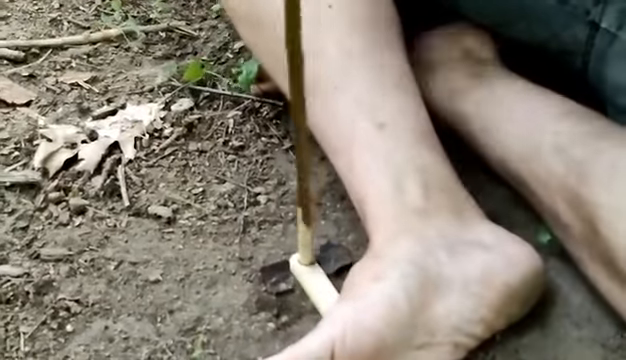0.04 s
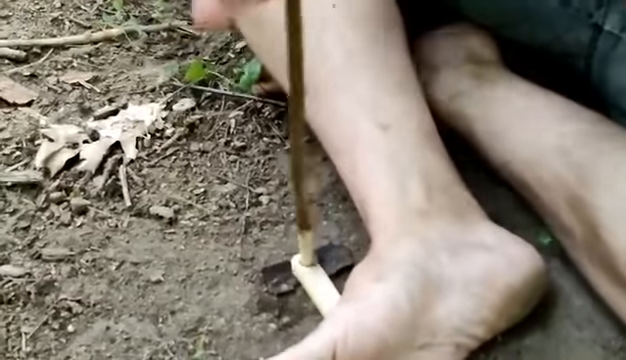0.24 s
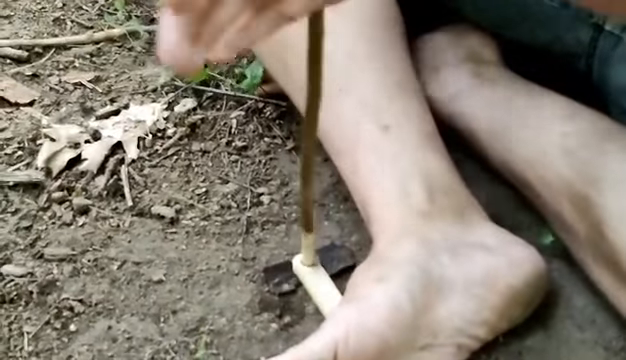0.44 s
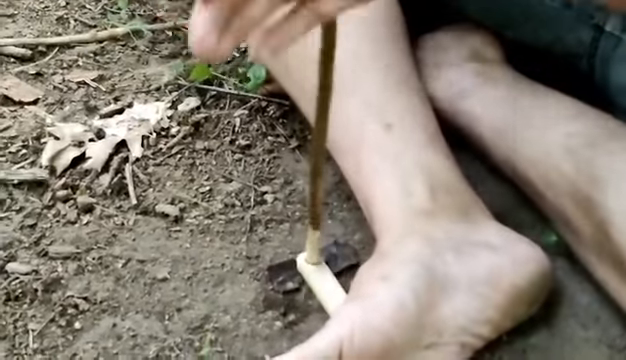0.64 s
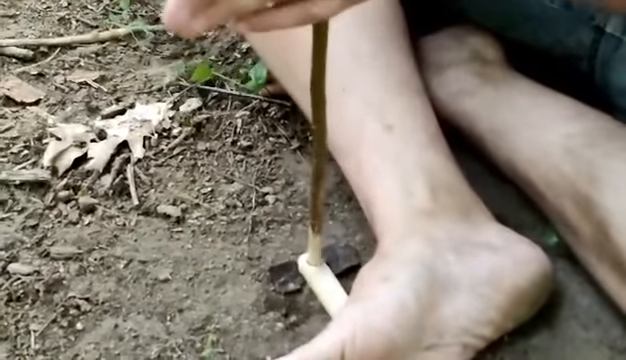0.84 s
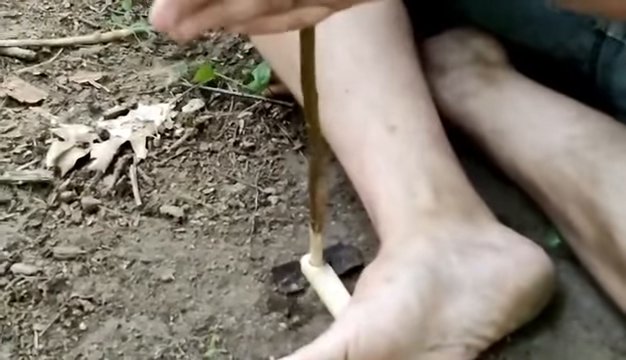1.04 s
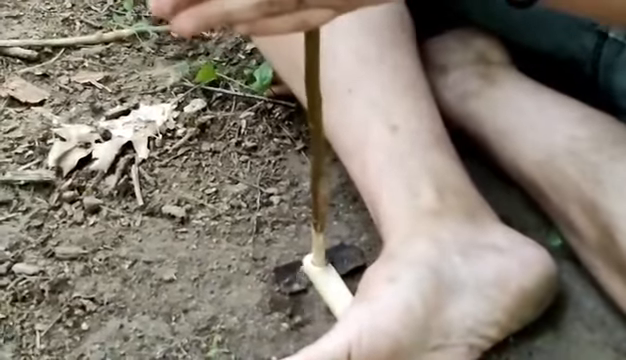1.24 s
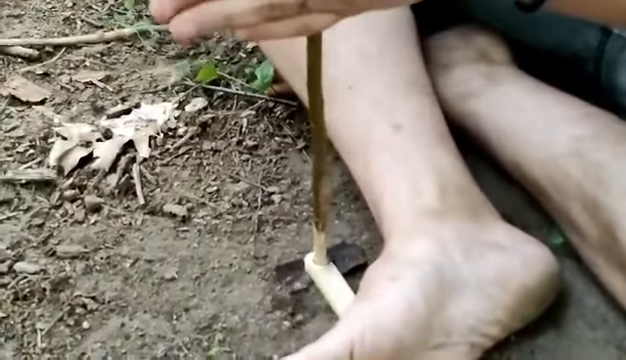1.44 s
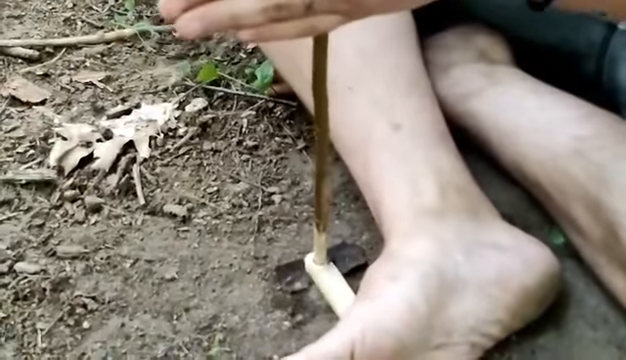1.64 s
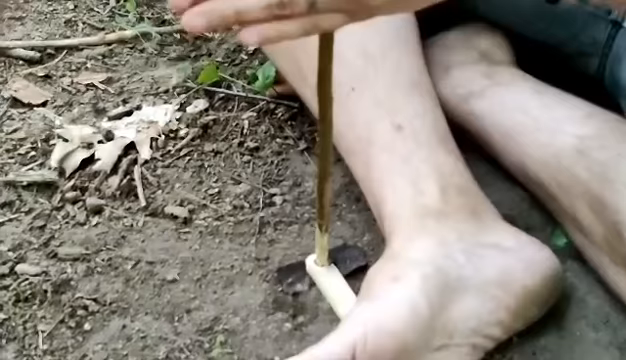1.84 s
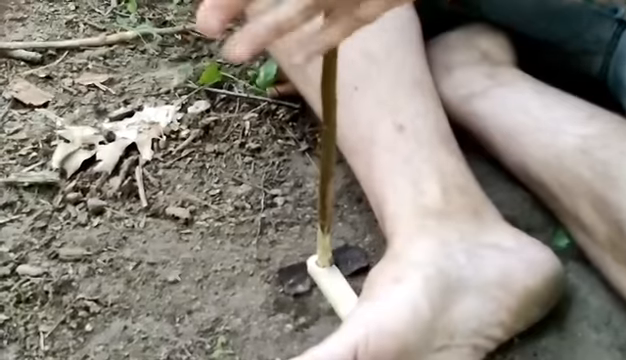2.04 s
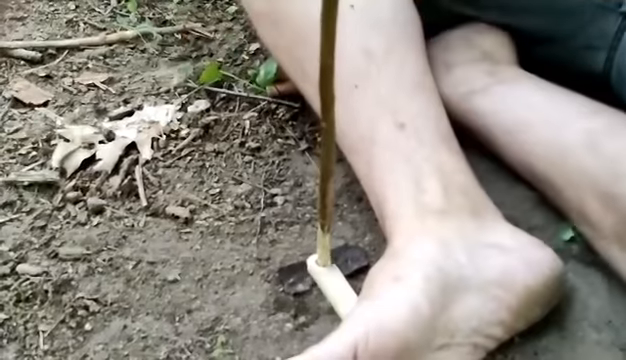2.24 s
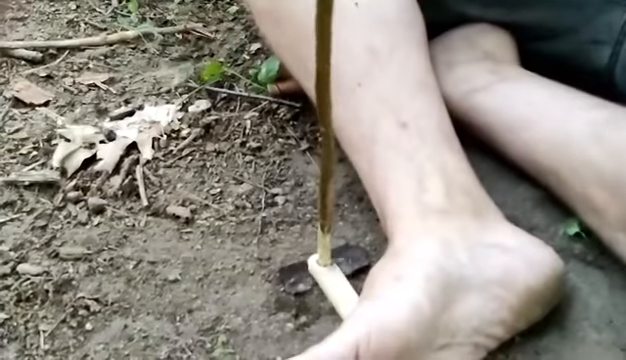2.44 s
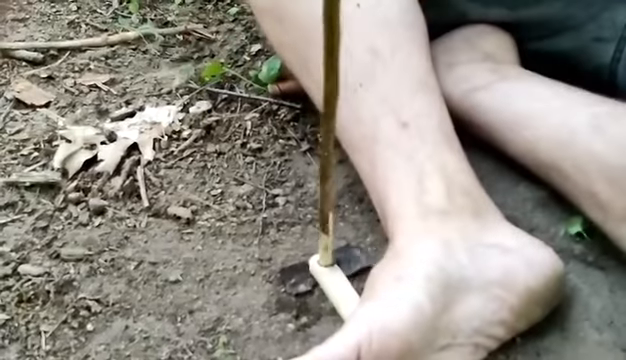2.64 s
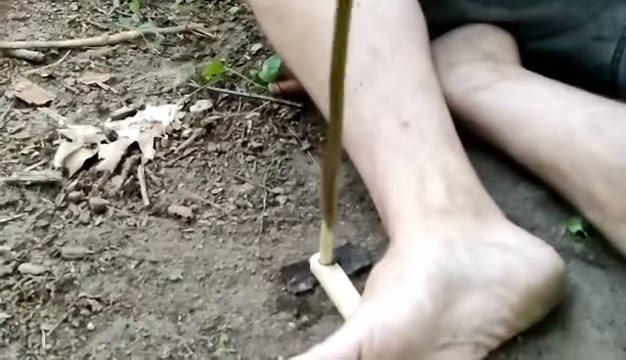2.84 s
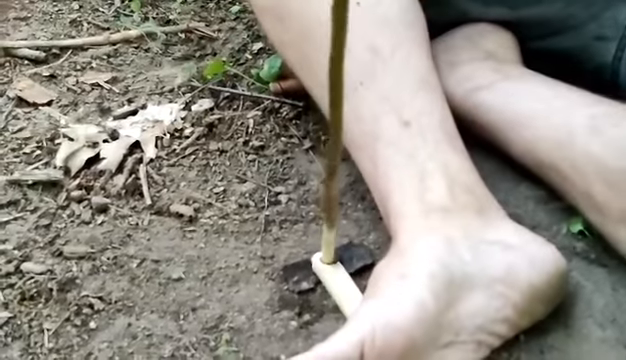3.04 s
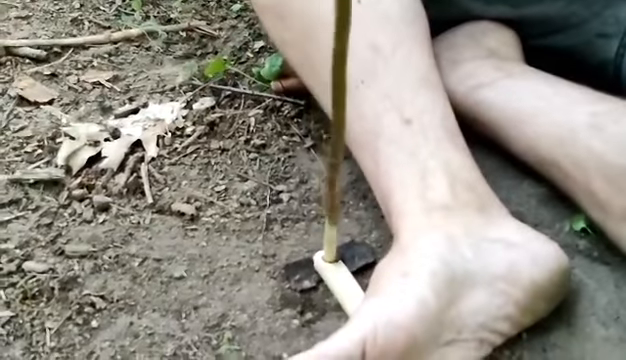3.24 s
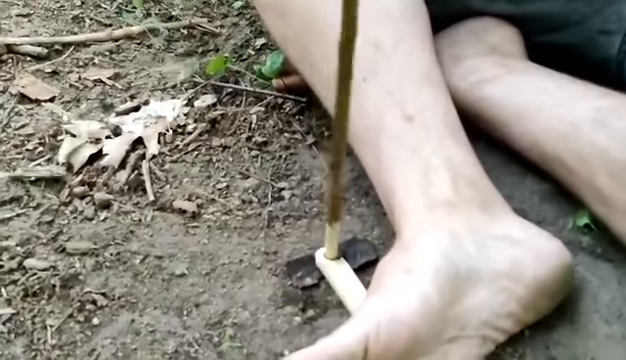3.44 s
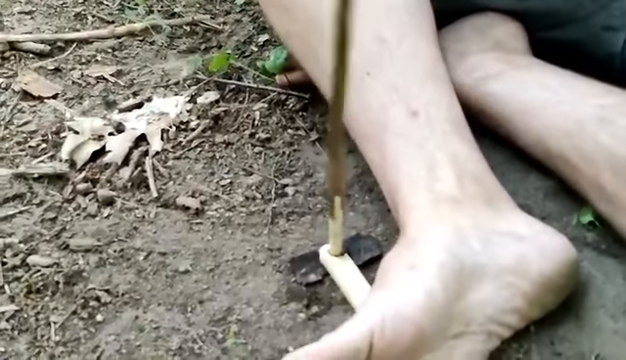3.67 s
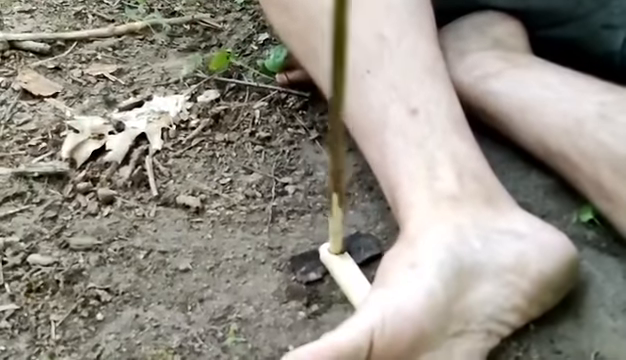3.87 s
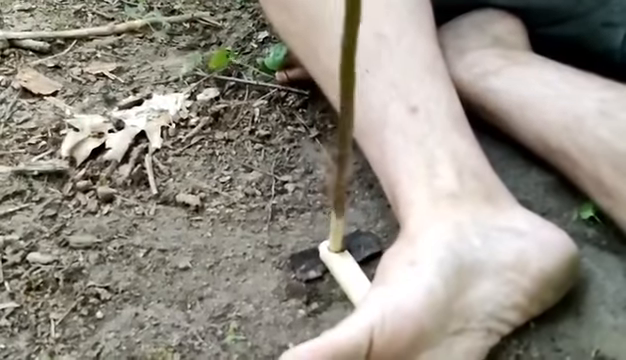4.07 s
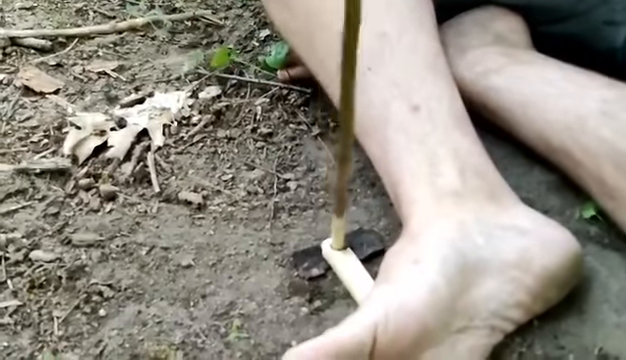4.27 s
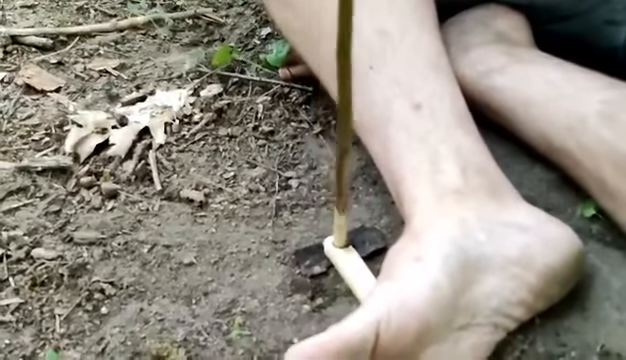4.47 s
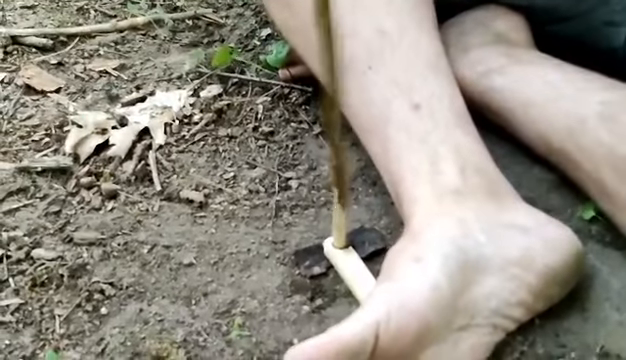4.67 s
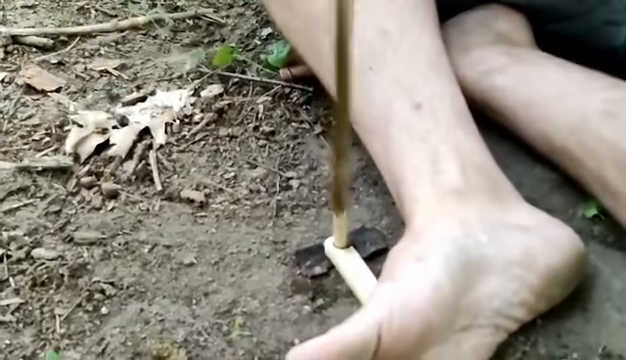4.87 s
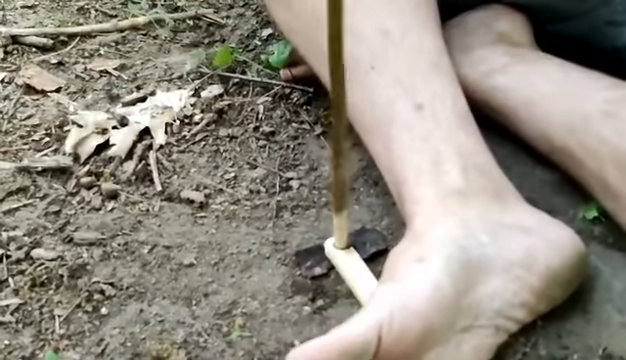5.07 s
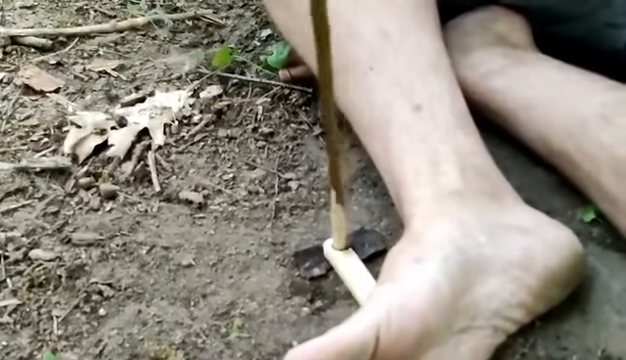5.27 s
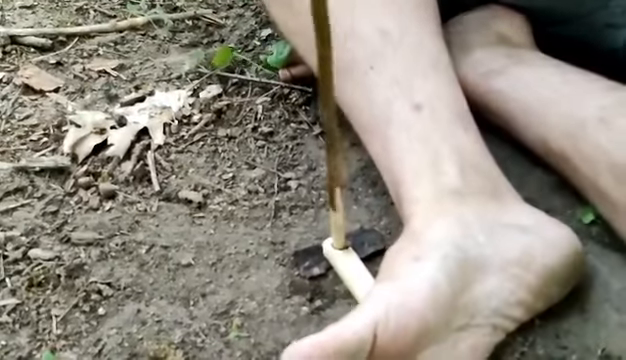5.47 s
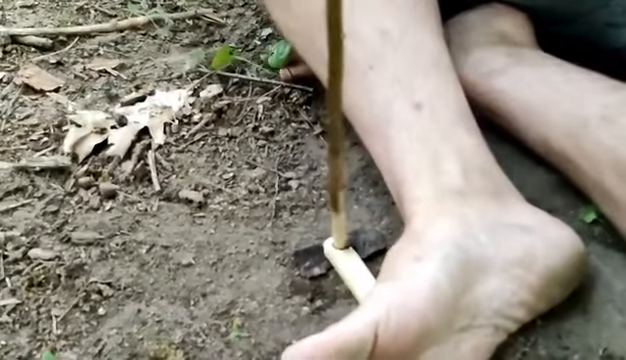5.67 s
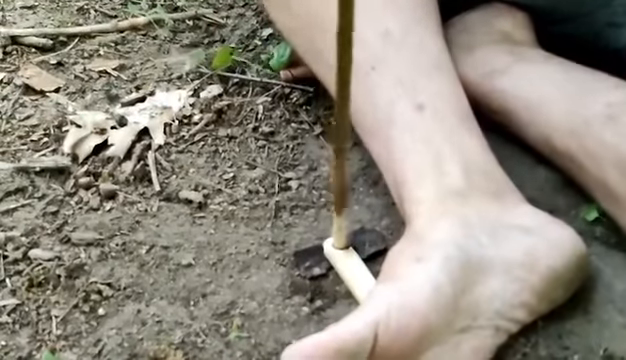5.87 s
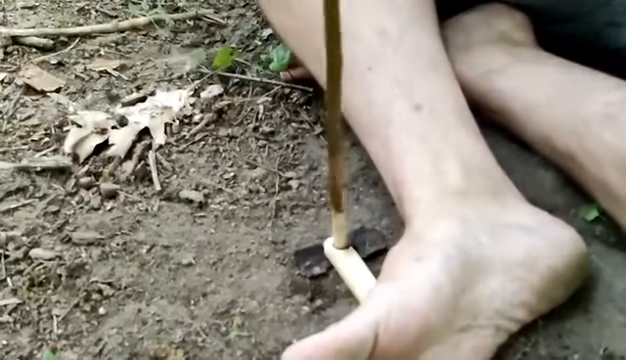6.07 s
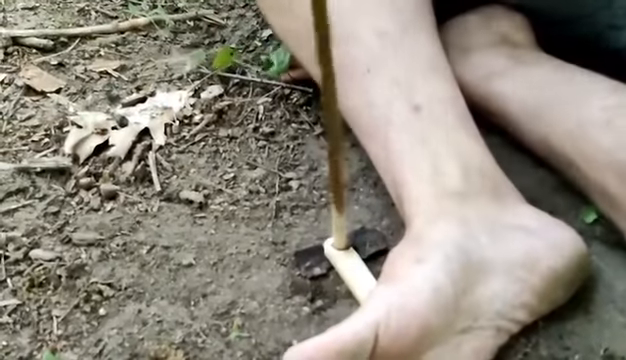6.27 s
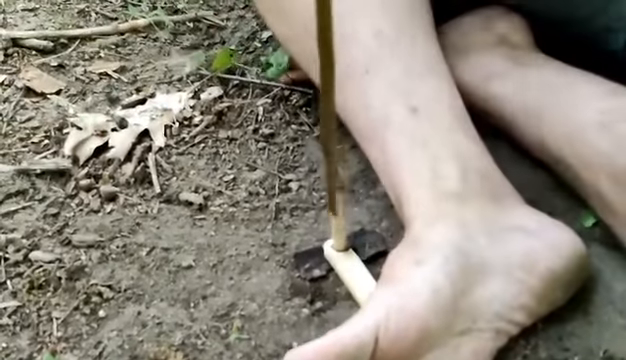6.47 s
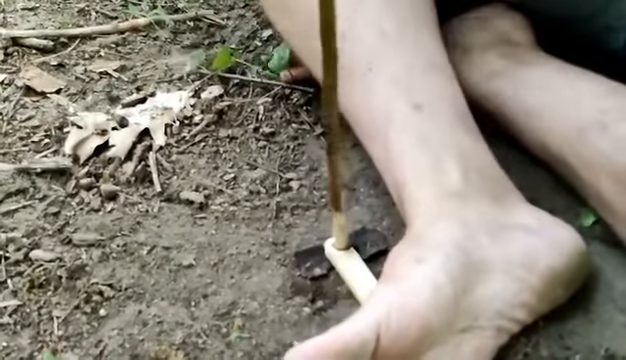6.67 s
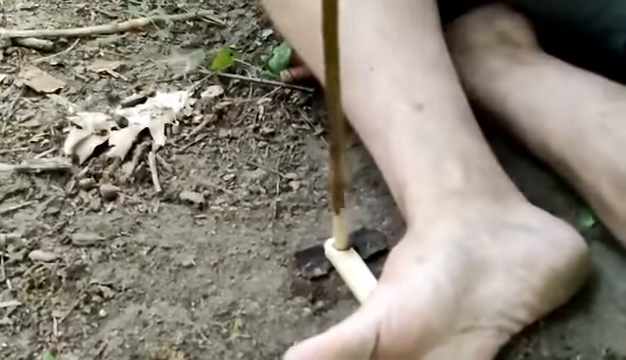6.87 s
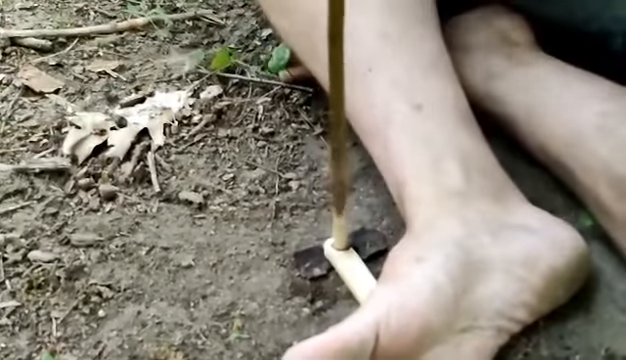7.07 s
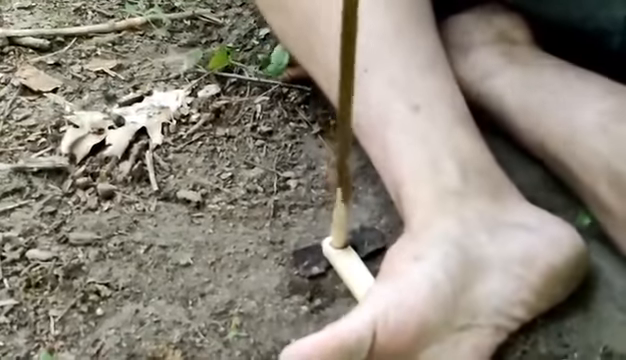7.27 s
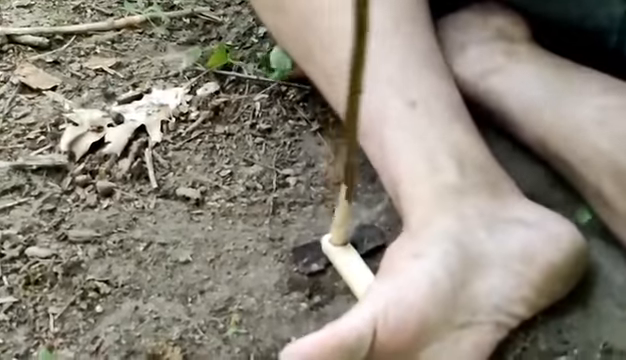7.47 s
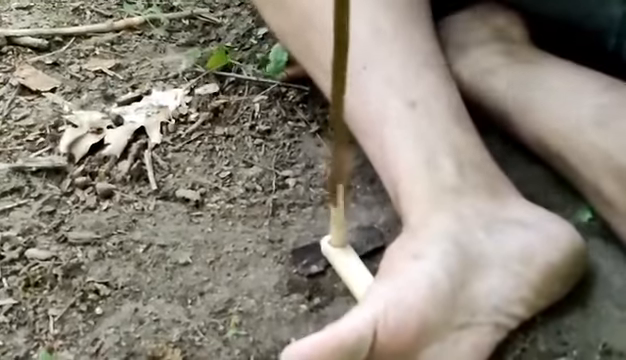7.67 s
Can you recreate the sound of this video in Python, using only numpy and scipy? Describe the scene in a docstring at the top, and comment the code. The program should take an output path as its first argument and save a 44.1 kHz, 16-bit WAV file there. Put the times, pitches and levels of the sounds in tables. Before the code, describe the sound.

Close to the microphone, palms spin a wooden stick in a board: a few quick, dry, scratchy strokes, then a pause of nearly two seconds with only leaf hush and low far rumble. Sharp little finger ticks on the phone mark the restart, and rapid even rubbing continues to the end with occasional small wood knocks. A faint distant engine hums below. Open forest, no echo, handheld phone stereo.

```python
"""Hand drill on a forest floor

Palms spin a wooden spindle to and fro in a board: slipping fibres excite noise bands, swelling per stroke.
Hands pause and start again; tip knocks ring the board's modes. Banded noise makes leaves and far traffic,
sines a far engine. A phone listens with two unlike ports: the left is shaded, lags and hears finger ticks.
"""
import sys
import numpy as np
from scipy import signal
from scipy.io import wavfile

SR = 44100
rng = np.random.default_rng(int(sys.argv[2]) if len(sys.argv) > 2 else 0)


def log_audio(samples):
    """Write samples as a 16-bit WAV file to the path given in sys.argv[1]."""
    # one column per channel
    frames = np.atleast_2d(samples).T
    # limit to full scale, then quantise
    limited = np.clip(frames, -1, 1)
    pcm = np.round(limited * 32767).astype(np.int16)
    wavfile.write(sys.argv[1], SR, pcm)


N = 340011
HOP = 16   # samples per step of slow curves


def amp(db):
    """dB to gain."""
    return np.exp(np.asarray(db) * (np.log(10) / 20))


def at_hz(points, hz):
    """Read a table on a log-frequency axis."""
    table_hz, values = np.array(points).T
    return np.interp(np.log(hz), np.log(table_hz), values)


def in_time(rows):
    """Columns of a curve at every sample."""
    s, *columns = np.transpose(rows)
    return [np.interp(np.arange(N) / SR, s, c) for c in columns]


def drift(rate_hz, size=N, step=1):
    """Low-passed noise of spread 1, one value every step samples."""
    r = np.exp(-2 * np.pi * rate_hz * step / SR)
    settle = SR // step
    slow = signal.lfilter([1], [1, -2 * r, r * r], rng.standard_normal(size + settle))[settle:]
    return slow / slow.std()


def coarse_drift(rate_hz):
    """Drift held over HOP samples."""
    return np.repeat(drift(rate_hz, size=N // HOP + 1, step=HOP), HOP)[:N]


def band(x, low_hz, high_hz):
    """Band-pass that turns unit white noise into unit power per kHz."""
    sos = signal.butter(2, [low_hz, high_hz], "band", fs=SR, output="sos")
    return signal.sosfilt(sos, x) * np.sqrt(SR / 2000)


def decaying_mode(clicks, hz, t60_s):
    """Two-pole resonator: each click starts a sine that falls 60 dB in t60_s."""
    r, w = amp(-60 / (t60_s * SR)), 2 * np.pi * hz / SR
    return signal.lfilter([0, np.sin(w)], [1, -2 * r * np.cos(w), r * r], clicks)


# noise common to both ports: [f/Hz, share/1]
PORT_LIKENESS = [(100, 0.99), (300, 0.75), (520, .68), (860, 0.82), (1400, 0.68), (1900, .35), (2400, .55),
                 (2950, 0.72), (3450, .25), (4100, .55), (4900, 0.35), (6000, 0.13), (10500, 0.12),
                 (12000, 0.62), (13000, 0.6)]


def port_pair(white, hz, lag, facing_s=(0, 0)):
    """Left and right noise from two draws; the shared part reaches left late, except in facing_s."""
    alike = np.clip(at_hz(PORT_LIKENESS, hz), 0, 1)
    shared_left = np.roll(white[0], round(at_hz(lag, hz) * SR))
    facing = slice(round(facing_s[0] * SR), round(facing_s[1] * SR))
    shared_left[facing] = white[0, facing]
    left = alike * shared_left + np.sqrt(1 - alike ** 2) * white[1]
    return np.array([left, white[0]])


# forest hush spectrum, relative: [f/Hz, level/dB]
LEAF_SPECTRUM = [(250, -15), (400, 0.5), (700, -5), (1100, -7), (1700, -6), (2400, -8), (3700, -11.5),
                 (5000, -15), (6500, -20), (8300, -25), (13000, -32)]
# left port lag for forest sound: [f/Hz, lag/s]
FOREST_LAG = [(100, .00004), (1000, .0001), (1700, .0003), (13000, .0003)]
# shaded left port against the right: [f/Hz, level/dB]
LEFT_PORT = [(300, 3.5), (1100, 0.5), (2400, 1), (3000, 1.5), (3700, -11.5), (4600, -5.5), (5500, -18.5),
             (6700, -40), (7500, -26), (9200, -14.5), (10000, -11.5), (11000, -14.5), (12000, -8),
             (13000, 3)]


def leaves():
    """Hush: third-octave noise bands that swell together and on their own."""
    base_db = -61
    edges_hz = 250 * 2 ** np.arange(0, 5.7, 1 / 3)
    white = rng.standard_normal((2, 2, N))
    gust, out = coarse_drift(0.47), 0
    for k, (low, high) in enumerate(zip(edges_hz, edges_hz[1:])):
        hz = np.sqrt(low * high)
        shade_db = [[0.35 * at_hz(LEFT_PORT, hz)], [0]]   # sound from all round is shaded less
        swell_db = 0.92 * gust + 2.2 * coarse_drift(9)
        gain = amp(base_db + at_hz(LEAF_SPECTRUM, hz) + swell_db) * amp(shade_db)
        out = out + band(gain * port_pair(white[k % 2], hz, FOREST_LAG), low, high)
    return out


# traffic spectrum, relative: [f/Hz, level/dB]
RUMBLE_SPECTRUM = [(45, -2), (70, -2), (100, -4), (150, -9), (200, -15), (280, -25.5)]
# low sound of the place: [t/s, rumble level/dB, air thud level/dB, thud lean to left/dB]
LOW_SOUND = [(0.0, -48, -41.5, -1), (1.1, -51, -49, 8), (2.2, -52.5, -50.5, 6.5), (3.4, -47, -48, 16.5),
             (3.62, -43, -36, 15), (3.8, -48.5, -43.5, 12.5), (4.6, -46.5, -44.5, 3),
             (6.2, -45.5, -45.5, 15), (7.0, -44.5, -47, 18), (7.71, -43, -47, 12)]


def rumble(rumble_db, thud_db, lean_db):
    """Far traffic in third-octave bands that swell on their own; loose air thuds at the ports below."""
    edges_hz, bands = 45 * 2 ** np.arange(0, 2.7, 1 / 3), 0
    white = rng.standard_normal((2, 2, N))
    for k, (low, high) in enumerate(zip(edges_hz, edges_hz[1:])):
        hz = np.sqrt(low * high)
        gain = amp(at_hz(RUMBLE_SPECTRUM, hz) + 1.96 * coarse_drift(1.0))
        bands = bands + gain * band(port_pair(white[k % 2], hz, FOREST_LAG), low, high)
    shared, own = rng.standard_normal(N), rng.standard_normal((2, N))
    thud = band(shared + 0.55 * own, 9.1, 32.2)
    traffic = amp(rumble_db) * amp([[1.2], [-1.2]]) * bands / bands.std()   # leans left
    return traffic + amp(thud_db + [[.5], [-.5]] * lean_db) * thud / thud.std()


# far engine, one list per gear: [t/s, firing f/Hz, level/dB]
ENGINE_GEARS = [
    [(2.1, 59.84, -55), (2.7, 67.8, -52), (3.4, 77.56, -55.5)],
    [(4.05, 59, -49), (4.4, 60.7, -44), (5.0, 63.36, -50), (5.5, 65.6, -47), (6.2, 68.82, -44.5),
     (7.0, 71.56, -45.5), (7.71, 74.4, -44)],
]
# engine orders: [multiple of firing f/1, level/dB]
ENGINE_ORDERS = [(1, 0), (1.5, -10), (2, -14), (2.5, -14)]


def engine():
    """Far engine in two gears: low orders of the firing rate, wavering on their way through the trees."""
    out, t = np.zeros(N), np.arange(N) / SR
    for gear in ENGINE_GEARS:
        hz, level_db = in_time(gear)
        phase = 2 * np.pi * np.cumsum(hz * (1 + 0.004 * drift(3.9))) / SR
        start_s, end_s = gear[0][0], gear[-1][0]
        fade = np.clip(np.minimum(t - start_s, end_s - t) / 0.067 + 1, 0, 1)
        for multiple, order_db in ENGINE_ORDERS:
            level = amp(level_db + order_db + 1.5 * coarse_drift(1.6))
            out += np.sqrt(2) * fade * level * np.sin(multiple * phase)
    return out * amp([[1.2], [-1.2]])   # leans left


# fingers ticking on the case: [t/s, left level/dB, right level/dB, case ring against tick/dB]
FINGER_TICKS = [(0.1907, -45, -59, -9), (2.1124, -36, -56, -12), (2.1187, -28.5, -55, -22),
                (2.1242, -41, -57, -20), (2.129, -45, -58, -6), (2.1317, -31.5, -58, 4),
                (2.355, -31.5, -66, -23), (2.472, -30.5, -63, -3.5), (2.4885, -40, -58, -3),
                (2.511, -40, -41, 1), (2.7307, -29, -53, -5), (6.0262, -24.5, -51, -9)]


def ticks():
    """A tick pushes the ports once: a short dull pulse on a slower shove, and a brief ring of the case."""
    pulse_hz, shove_hz, shove_db = 2400, 444, 0.5
    clicks, rings = np.full((2, 2, N), 1e-18)
    for s, left_db, right_db, ring_db in FINGER_TICKS:
        clicks[:, round(s * SR)] = -amp([left_db, right_db])
        rings[:, round(s * SR)] = -amp([left_db + ring_db, right_db + ring_db])
    pulse_sos = signal.bessel(4, pulse_hz, fs=SR, output="sos", norm="mag")
    pulse = signal.sosfilt(pulse_sos, clicks) * SR / (2 * pulse_hz)
    shove = signal.lfilter(*signal.butter(1, shove_hz, fs=SR), pulse)
    shove = shove * amp(shove_db) * pulse_hz / (np.pi * shove_hz)
    push = signal.lfilter(*signal.butter(1, 60, "high", fs=SR), pulse + shove)
    ring = decaying_mode(rings, hz=3960, t60_s=0.0058)
    return push + signal.sosfilt(signal.butter(4, 5000, fs=SR, output="sos"), ring)


# knocks on the board, mostly the spindle tip catching in its notch; the faint knock at 6.027 s sounds together
# with a finger tick: [t/s, level/dB]
TIP_KNOCKS = [(.098, -52), (0.167, -44), (0.501, -42), (.543, -41), (1.3324, -39), (2.964, -47),
              (3.582, -32.5), (3.967, -41), (4.427, -34), (4.645, -32.5), (4.756, -38), (5.313, -38),
              (5.771, -39), (5.888, -34), (6.027, -49), (6.148, -43), (6.849, -35.5), (7.661, -36.5)]
# board modes: [f/Hz, level/dB, t60/s]
BOARD_MODES = [(446, -14, 0.042), (900, -6, 0.03), (1540, -6, 0.015), (2300, -7, 0.0074),
               (2740, -9, 0.0087), (3800, -5, 0.017)]


def knocks():
    """Each catch of the tip strikes the board's modes with strengths of its own."""
    times_s, knock_db = np.transpose(TIP_KNOCKS)
    at, out = [round(s * SR) for s in times_s], np.zeros(N)
    strengths_db = rng.normal(0, 0.26, (len(at), len(BOARD_MODES)))
    for (hz, level_db, t60_s), strength_db in zip(BOARD_MODES, strengths_db.T):
        clicks = np.full(N, 1e-18)
        clicks[at] = amp(knock_db + level_db + strength_db)
        out += decaying_mode(clicks, hz, t60_s)
    soft_contact = signal.butter(2, 4500, fs=SR, output="sos")
    return signal.sosfilt(soft_contact, out) * amp([[0.0], [0.5]])


# strokes, pull and push in turn, pull first: [start t/s, end t/s, scrape level/dB]
STROKES = [(-0.03, 0.061, -46), (0.072, 0.17, -45.5), (0.193, 0.303, -48), (0.313, 0.422, -46.5),
           (0.441, 0.556, -49.5), (0.56, 0.67, -51.5), (0.67, 0.748, -64.5), (2.505, 2.545, -59),
           (2.542, 2.641, -45), (2.671, 2.746, -49), (2.763, 2.838, -41.5), (2.86, 2.943, -46.5),
           (2.955, 3.031, -46.5), (3.047, 3.134, -52), (3.147, 3.225, -50), (3.246, 3.332, -51),
           (3.35, 3.432, -46.5), (3.452, 3.551, -48), (3.56, 3.64, -45), (3.663, 3.754, -46),
           (3.765, 3.844, -47), (3.871, 3.956, -47.5), (3.97, 4.055, -48), (4.074, 4.169, -51.5),
           (4.177, 4.26, -49), (4.285, 4.382, -50.5), (4.394, 4.483, -48), (4.504, 4.599, -49.5),
           (4.615, 4.703, -48.5), (4.726, 4.82, -49), (4.829, 4.922, -47), (4.941, 5.044, -48),
           (5.052, 5.151, -47), (5.173, 5.269, -46.5), (5.282, 5.376, -46), (5.404, 5.489, -43),
           (5.503, 5.607, -48.5), (5.631, 5.725, -46), (5.739, 5.834, -46.5), (5.862, 5.952, -46),
           (5.957, 6.066, -50), (6.096, 6.188, -46), (6.199, 6.298, -49), (6.32, 6.418, -51.5),
           (6.423, 6.533, -50.5), (6.539, 6.648, -50), (6.659, 6.761, -49.5), (6.781, 6.885, -47.5),
           (6.897, 6.996, -48), (7.025, 7.128, -51), (7.138, 7.236, -50), (7.259, 7.368, -50.5),
           (7.382, 7.483, -48), (7.513, 7.619, -48.5), (7.631, 7.735, -49)]


def per_stroke(rows):
    """Columns of a curve read at the start of each stroke."""
    s, *columns = np.transpose(rows)
    starts_s = np.array(STROKES)[:, 0]
    return np.transpose([np.interp(starts_s, s, c) for c in columns])


# share of a stroke passed when the spindle turns fastest: [t/s, pull share/1, push share/1]
FASTEST_SHARE = [(0, 0.41, 0.61), (2.5, 0.34, 0.52), (4.6, 0.37, 0.74), (5.6, 0.59, .52), (7.7, 0.47, 0.69)]


def spin_speed(power, tail_s, tail_db):
    """Rows of loudness per stroke: the spindle speeds up, peaks and halts at each reversal."""
    t = np.arange(N // HOP + 1) * HOP / SR
    start, end = np.array(STROKES)[:, :2, None].transpose(1, 0, 2)
    index = np.arange(len(STROKES))
    way = index % 2   # 0 pull, 1 push
    share = per_stroke(FASTEST_SHARE)[index, way, None]
    grab_db = np.array([-8, -11.5])[way, None]   # first bite of the skin
    lead_s = np.array([0.0069, .0063])[way, None]   # early grip
    overrun_s = np.array([0.00044, 0.00035])[way, None]   # late release
    fastest = start + np.clip(share, .05, .95) * (end - start)
    rising = (fastest - t) / (fastest - start + lead_s)
    falling = (t - fastest) / (end + overrun_s - fastest)
    phase = np.where(t < fastest, rising, falling)
    # skin grips and lets go abruptly
    grab = np.clip(np.minimum(t - start + lead_s, end + overrun_s - t) / 0.0089, 0, 1)
    spin = amp(grab_db) * grab + np.cos(np.pi / 2 * np.clip(phase, 0, 1)) ** power
    r = np.exp(-HOP / SR / tail_s)   # a faint short tail trails each stroke
    return spin + amp(tail_db) * signal.lfilter([1 - r], [1, -r], spin)


# rub spectrum at the open port, relative: [f/Hz, level/dB]
RUB_SPECTRUM = [(250, -9), (400, -15.5), (700, -5), (1100, -12.5), (1600, -5.5), (2100, -4), (3000, -0.5),
                (3700, 3.5), (4300, -1.5), (5000, -3), (6200, 4.5), (7500, 4), (8300, -3.5), (11000, -10),
                (13000, -13.5)]
# left port lag for the drill: [f/Hz, lag/s]
DRILL_LAG = [(300, .00006), (2400, .00009), (3000, .00013), (4000, .00025), (9200, .00027), (11500, .00026)]
# where board tone, scrape, palm hiss and sheen rule: [f/Hz] each
COLOUR_HZ = [1730, 3430, 7400, 9400]
# colour against the scrape, by the hands' place on the spindle: [t/s, board tone/dB, palm hiss/dB, sheen/dB]
COLOUR = [(0, -1.5, -10, -14), (0.35, -2, -7.5, -7.5), (0.7, 1, -6, -9), (2.52, -7.5, -6.5, -15),
          (2.88, -6.5, -5, -9.5), (3.05, 0, 1, 0), (3.3, -1, 0.5, 1.5), (3.7, -2, -5.5, -2),
          (4.2, 3.5, -1.5, 0.5), (5.0, 2.5, -1.5, -3), (5.4, -0.5, -7.5, -2), (5.8, 1, -2.5, -2.5),
          (6.5, 2, -2, -1.5), (7.0, -0.5, -6.5, -1), (7.7, -1, -3.5, -2)]
# a pull against a push: [board tone/dB, palm hiss/dB, sheen/dB]
PULL_COLOUR_DB = [-2, 0, 2.5]
# where left bass, body and treble rule: [f/Hz] each
LEFT_TURN_HZ = [1290, 3650, 9500]
# the phone turning in the hand, at the left port: [t/s, body/dB, treble/dB]
LEFT_TURN = [(0, 1, 11), (0.35, 1, 3), (0.7, 0, 10), (2.52, 2.5, 16), (2.9, 8.5, 15.5), (3.15, 4, 6),
             (3.35, -1.5, 2), (4.5, -2, 0.5), (5.0, 0, 3.5), (5.4, -3.5, 2), (6.0, 0, 4.5), (6.45, 1, 0),
             (6.9, -5, 0), (7.3, -10.5, 1), (7.7, -7, 0)]
# a pull against a push at the left port: [body/dB, treble/dB]
PULL_LEFT_DB = [0.3, -3]


def rubbing():
    """Fibres slip in uneven bursts and excite narrow bands of wood and skin, other ones on each stroke."""
    scrape_db, count = np.array(STROKES)[:, 2], len(STROKES)
    speed = spin_speed(power=1.74, tail_s=0.045, tail_db=-19.5)
    pull = 1 - np.arange(count)[:, None] % 2
    # zero columns: the scrape is the colour reference, turning leaves the bass alone
    colour = np.insert(per_stroke(COLOUR) + pull * PULL_COLOUR_DB, 1, 0, axis=1)
    turn = np.insert(per_stroke(LEFT_TURN) + pull * PULL_LEFT_DB, 0, 0, axis=1)
    slips, judder = drift(780), drift(24)
    edges_hz = 2500 * np.sinh(np.arange(.1, 2.42, .06))
    white, out = rng.standard_normal((2, 2, N)), np.zeros((2, N))
    # single fibres snap out of the hiss, in every band at once, 700 per s on average
    snaps = (rng.random(N) < 700.0 / SR) * rng.choice([-1, 1], N)
    snap_db = 9 + 2.02 * np.minimum(rng.exponential(1, N), 4)
    white = white + snaps * amp(snap_db) * [[1], [.6]]
    for k, (low, high) in enumerate(zip(edges_hz, edges_hz[1:])):
        hz = np.sqrt(low * high)
        grip = at_hz([(700, 3.6), (6000, .8)], hz)   # the board tone comes in coarser lumps
        rough = amp(grip * slips + 1.5 * judder + 3.0 * coarse_drift(22.5) - 0.23 * grip ** 2)
        colour_db = [np.interp(np.log(hz), np.log(COLOUR_HZ), row) for row in colour]
        level_db = scrape_db + at_hz(RUB_SPECTRUM, hz) + colour_db + rng.normal(0, 1.63, count)
        turn_db = [np.interp(np.log(hz), np.log(LEFT_TURN_HZ), row) for row in turn]
        left_db = turn_db + rng.normal(0, 1.34, count)
        gains = np.repeat(amp([level_db + left_db, level_db]) @ speed, HOP, axis=1)[:, :N]
        # no left lag while both ports face the drill
        rub = gains * rough * port_pair(white[k % 2], hz, DRILL_LAG, facing_s=(2.45, 3.24))
        out += band(rub + 1e-18, low, high) * amp([[at_hz(LEFT_PORT, hz)], [0]])
    return out


# narrow resonances of board and spindle: [f/Hz, width/Hz, added level/dB]
RESONANCES = [(704, 23, -14), (2200, 50, -3.5), (2720, 59, -5), (4716, 23, 4.5)]


def ringing(x):
    """Board and spindle: add each narrow resonance to the sound that drives it."""
    out = x
    for hz, width_hz, db in RESONANCES:
        out = out + amp(db) * signal.lfilter(*signal.iirpeak(hz, hz / width_hz, fs=SR), x)
    return out


def scene():
    """Drill, handling and forest at the two ports."""
    drill = ringing(rubbing()) + knocks() + ticks()
    return drill + leaves() + rumble(*in_time(LOW_SOUND)) + engine()


def record(dry):
    """The left port's cavity cancels one band; each capsule adds bright hiss; the top is cut."""
    notch_hz, notch_width_hz = 6660, 230
    hiss_db, hiss_rise_hz, cutoff_hz = -69, 7600, 13750   # hiss_db: before the high-pass
    left = signal.lfilter(*signal.iirnotch(notch_hz, notch_hz / notch_width_hz, fs=SR), dry[0])
    rise = signal.butter(2, hiss_rise_hz, "high", fs=SR)
    hiss = amp(hiss_db) * signal.lfilter(*rise, rng.standard_normal((2, N)))
    top_cut = signal.cheby2(14, 70, cutoff_hz, fs=SR, output="sos")
    return signal.sosfilt(top_cut, np.array([left, dry[1]]) + hiss)


dry = scene()
out = record(dry)
log_audio(out)
```